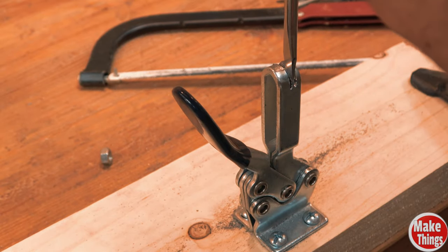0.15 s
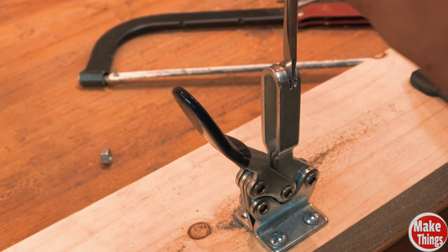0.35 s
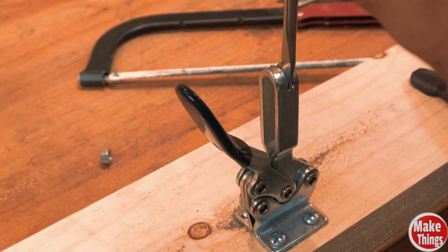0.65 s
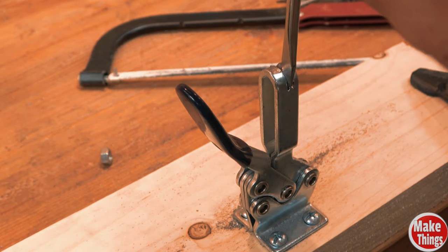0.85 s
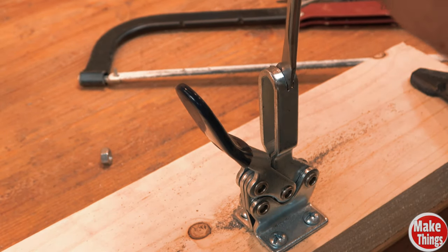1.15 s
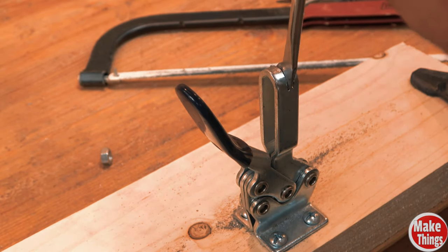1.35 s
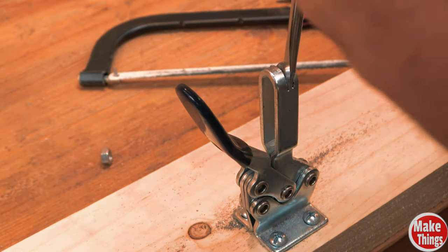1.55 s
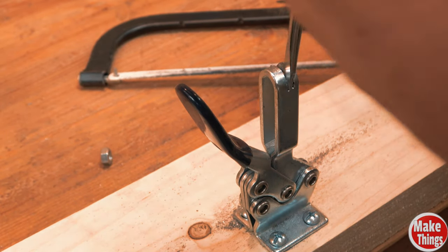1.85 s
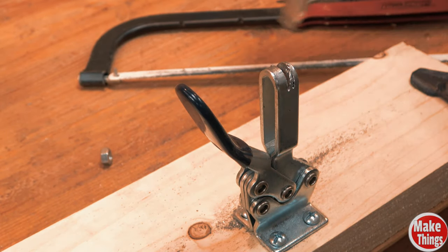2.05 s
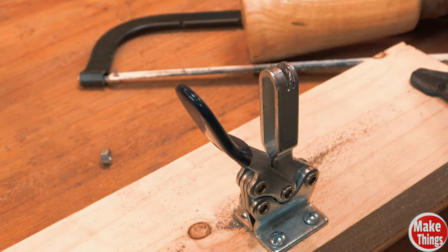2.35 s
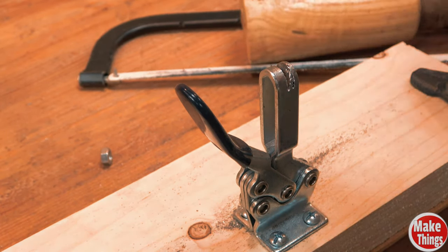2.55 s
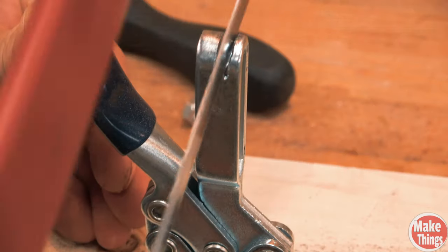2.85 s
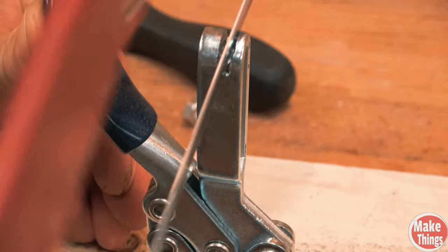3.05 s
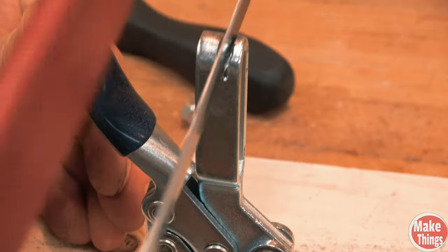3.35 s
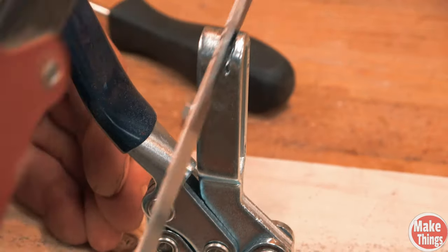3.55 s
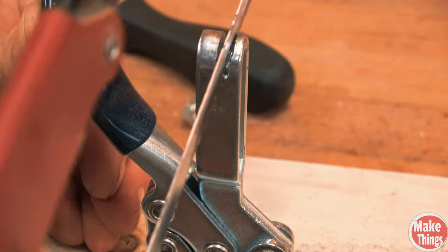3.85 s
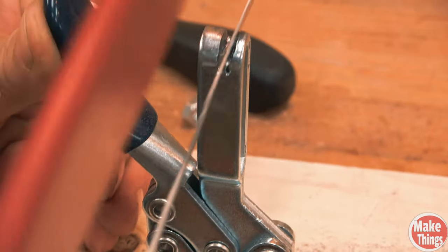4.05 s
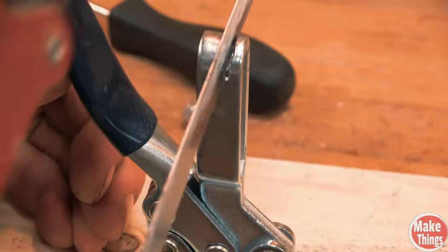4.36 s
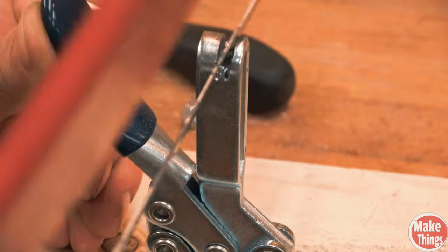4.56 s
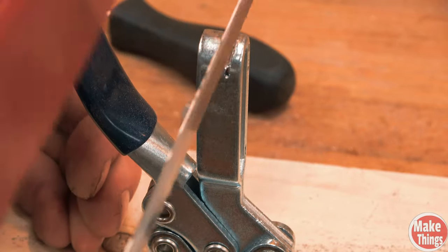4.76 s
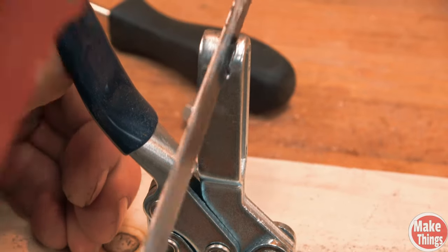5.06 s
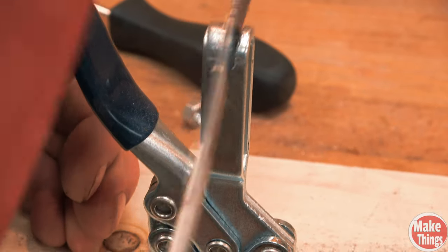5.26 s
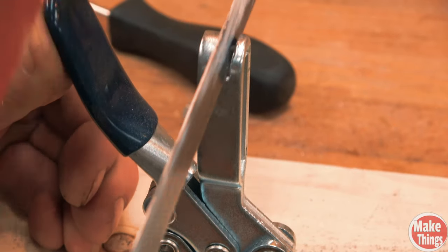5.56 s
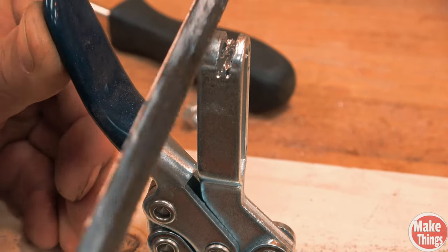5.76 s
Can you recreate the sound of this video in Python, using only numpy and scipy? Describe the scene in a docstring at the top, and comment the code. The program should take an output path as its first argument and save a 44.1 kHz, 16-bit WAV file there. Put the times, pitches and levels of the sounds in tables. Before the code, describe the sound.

In a quiet workshop, close to a wooden bench, a mallet drives a screwdriver into a steel clamp with four sharp, cracking blows. The bench rings briefly after each, and the tip grinds faintly in between. Tools are put down with light ticks and soft thuds. Then a hacksaw cuts the steel in sped-up, choppy rasping bursts, with brief rests, the wood droning and the metal ringing thinly.

```python
"""Mallet and hacksaw at the bench

A quiet workshop, a microphone close to a wooden bench. Four mallet blows drive a screwdriver into
a slot in a steel clamp screwed to a board; bench, board and shop ring, and the tip grinds between blows.
The tools are laid down with ticks and thuds. Then a hacksaw works the slot: sped-up, choppy sawing,
with rests, the teeth shaking the wood and setting the steel singing."""
import sys
import numpy as np
from scipy import signal
from scipy.fft import rfft, irfft, next_fast_len
from scipy.io import wavfile

SR = 44100
rng = np.random.default_rng(int(sys.argv[2]) if len(sys.argv) > 2 else 0)


def persist_wave(psi):
    """Save psi, clipped to +-1, as 16-bit WAV."""
    counts = np.round(np.clip(psi, -1, 1) * 32767).astype(np.int16)
    wavfile.write(sys.argv[1], SR, np.atleast_2d(counts).T)


N = 261060

# mallet on the screwdriver: start_s, snap_db, crack_db, bench_ring_db, shop_tail_db, clamp_knock_db
BLOWS = [(0.0078, -7, -18.5, -30, -27, -12.5), (0.555, -8.5, -20, -33, -31, -14.5),
         (0.911, -5.5, -18.5, -26.5, -28, -32.5), (1.2379, 1.5, -20, -29, -29.5, -19)]
CRACK_SPECTRUM = [(500, -19.5), (900, -9.5), (1250, -3), (1700, -14.5), (2300, -17.5), (2900, -22.5),
                  (3980, -13.5), (6230, -22), (7300, -16), (11400, -27), (12500, -23), (16300, -31.5)]  # struck steel, close up: pitch_hz, density_db
CRACK_DECAY = [(700, 0.11), (2000, 0.049), (6000, 0.076), (16000, 0.086)]  # how long it lasts: pitch_hz, t60_s
CLAMP_ARM_MODES = [(1104, -18, 0.04), (1210, -5, .04), (2260, -7, 0.0067)]  # the arm knocked by the tip: pitch_hz, level_db, t60_s
BENCH_MODES = [(75.6, -14, 0.8), (169.3, -3.5, 0.26), (181, -4, 0.31), (297, -6, 0.28), (404, -21.5, 0.12),
               (430.6, -8.5, 0.3), (461.3, 2, 0.26), (509, 4, 0.18), (524.4, -7, 0.28), (560, -11, 0.2),
               (607, 1.5, 0.13), (690, -4, 0.32), (754, -1, 0.22), (801, -3, 0.17), (990, -12, 0.16),
               (1221, -10, 0.15), (1375, -7, 0.051), (1551, -11.5, 0.04)]  # the bench struck through the clamp: pitch_hz, level_db, t60_s
TAIL_SPECTRUM = [(24, -49.5), (55, -17.5), (75, -5.5), (127, -22.5), (172, 3.5), (225, -7), (322, -14.5),
                 (459, -10.5), (686, -9), (882, -16.5), (975, -14.5), (2670, -35), (7480, -34.5),
                 (12100, -38.5), (16300, -64.5)]  # bench and shop ringing on: pitch_hz, density_db
TAIL_DECAY = [(50, 0.55), (160, 0.34), (500, 0.42), (1500, 0.41), (4000, 0.38), (16000, 0.25)]  # how long they ring: pitch_hz, t60_s


def mallet():
    """Each blow snaps and cracks on the steel, knocks the clamp arm, and rings bench and shop."""
    start_s, snap_db, crack_db, ring_db, tail_db, knock_db = np.transpose(BLOWS)
    snap = colour(clicks(start_s, from_db(snap_db)), CRACK_SPECTRUM)
    crack = dying_noise(start_s, crack_db, CRACK_SPECTRUM, CRACK_DECAY, rise_ms=.48)
    knock_s = np.r_[start_s, start_s + .0052]  # the tip bounces once, just as hard
    knock = strike(knock_s, np.r_[knock_db, knock_db], CLAMP_ARM_MODES, swell_q=.8, scatter_db=1.5)
    ring = strike(start_s, ring_db, BENCH_MODES, swell_q=10, scatter_db=1.5)
    lead_s = np.maximum(start_s - .011, 0)  # a faint low noise fades in just before each blow
    tail_and_lead = dying_noise(np.r_[start_s, lead_s], np.r_[tail_db, tail_db - 9],
                                TAIL_SPECTRUM, TAIL_DECAY, rise_ms=3.5)
    return snap + crack + knock + ring + tail_and_lead


# sped-up, choppy sawing, about 23 bursts a second: peak_s, wood_push_db, teeth_bite_db
SAW_BURSTS = [(2.875, -38, -42), (2.909, -35, -45.5), (2.956, -31.5, -41.5), (2.997, -34, -44.5),
              (3.04, -31, -39.5), (3.081, -32, -65.5), (3.127, -30, -40), (3.162, -32.5, -39),
              (3.21, -32.5, -41.5), (3.249, -34.5, -45.5), (3.291, -36.5, -40), (3.333, -35.5, -40.5),
              (3.385, -35.5, -41), (3.419, -31.5, -45), (3.465, -34, -40.5), (3.505, -35.5, -45),
              (3.551, -31.5, -37), (3.594, -40.5, -43.5), (3.639, -30.5, -36), (3.679, -31.5, -41.5),
              (3.718, -34, -41), (3.766, -34.5, -44.5), (3.815, -39.5, -45), (3.931, -38.5, -46),
              (3.979, -32, -42.5), (4.028, -35.5, -38.5), (4.068, -33, -40.5), (4.122, -27, -40),
              (4.159, -34, -41), (4.199, -32.5, -49.5), (4.235, -36, -46.5), (4.274, -39, -43.5),
              (4.316, -34.5, -45.5), (4.361, -35.5, -39), (4.445, -36, -65), (4.475, -35, -42),
              (4.531, -36, -40), (4.565, -27.5, -35), (4.662, -47, -50.5), (4.891, -58, -52.5),
              (4.992, -34, -40.5), (5.05, -31.5, -41), (5.093, -30.5, -44), (5.138, -33, -41),
              (5.18, -28.5, -40.5), (5.229, -29.5, -40), (5.308, -34.5, -48.5), (5.349, -27, -34.5),
              (5.396, -33, -35.5), (5.436, -30.5, -36.5), (5.479, -33.5, -38.5), (5.519, -29.5, -33),
              (5.565, -29.5, -39), (5.654, -35.5, -48), (5.679, -31.5, -38), (5.737, -34.5, -41.5),
              (5.78, -32, -37), (5.795, -43, -55.5)]
SLIDE = [(2.93, -48.5, -55), (3.03, -46, -56), (3.601, -40.5, -61.5), (3.8, -52, -60), (3.899, -54, -58.5),
         (4.11, -43.5, -49.5), (4.361, -45, -58), (4.42, -48.5, -57), (4.6, -56.5, -58),
         (4.93, -53.5, -57.5), (5.03, -43, -55.5), (5.22, -45, -49.5), (5.28, -48, -60), (5.45, -47, -55.5),
         (5.6, -50.5, -57), (5.78, -49.5, -59.5), (5.92, -51, -58.5)]  # the blade sliding lightly, through bursts and rests: time_s, drone_db, rasp_db
BOOM_SHARE = [(2.9, -2), (3.05, -3.5), (3.3, 2.5), (3.38, -1.5), (3.48, -21), (3.55, 1.5), (3.75, -0.5),
              (3.83, 10.5), (3.95, 3.5), (4.3, 0), (5.2, 1.5), (5.5, -1), (5.65, -4)]  # how much of the push reaches the deep boom: time_s, gain_db
BOOM_PEAKS = [(55.4, 54, -19), (152.5, 37.6, -1.5), (184.4, 41.1, -1), (281.7, 46, -7)]  # the bench booming under the saw: pitch_hz, width_hz, level_db
DRONE_PEAKS = [(353.3, 52, 0.5), (457, 66, 3.5), (537.4, 52, 3), (610, 53, 2.5), (754, 148, -3),
               (852, 160, -2.5), (1038, 18, -6), (1185, 660, -15.5)]  # the board droning: pitch_hz, width_hz, level_db
SINGING_PEAKS = [(1775, 50, -4), (2030, 90, 3), (2170, 90, -5), (2535, 34, 4), (3120, 60, -9),
                 (3245, 80, -5), (4050, 250, -11), (4400, 250, -10), (5300, 300, -14), (5990, 150, -7),
                 (6470, 110, -10), (6950, 170, -9), (7817, 150, -14), (8670, 250, -14), (10300, 400, -14)]  # the steel singing: pitch_hz, width_hz, level_db
RASP_SPECTRUM = [(530, -21), (900, -0.5), (1340, 0.5), (1520, -6), (2460, -9), (3580, -14), (4350, -13.5),
                 (5150, -18), (8000, -17.5), (12600, -26.5), (14800, -41), (16300, -63)]  # teeth on steel, close up: pitch_hz, density_db


def hacksaw():
    """Random teeth shake bench, board and steel; the sound comes in choppy bursts over a smooth slide."""
    saw_start_s, rise_ms, fall_ms = 2.867, 11, 8.65  # a burst: half to full power, and back to half
    t, power = np.arange(N) / SR, np.zeros((2, N))
    for peak_s, *levels_db in SAW_BURSTS:
        span = slice(round((peak_s - .08) * SR), round((peak_s + .08) * SR))
        ms = (t[span] - peak_s) * 1000
        bump = .5 ** (np.where(ms < 0, -ms / rise_ms, ms / fall_ms) ** 1.99)
        power[:, span] += from_db(2 * np.array(levels_db))[:, None] * bump
    sawing = t > saw_start_s
    push, bite_force = np.sqrt(power) * sawing
    deep_push = push * from_db(np.interp(t, *np.transpose(BOOM_SHARE)))
    slide_s, *slide_db = np.transpose(SLIDE)
    slide_low, slide_high = (sawing * from_db(np.interp(t, slide_s, db)) * rng.standard_normal(N)
                             for db in slide_db)
    teeth = grains(per_s=3000, spread_db=2.5)
    chips = grains(per_s=6000, spread_db=2.5) * from_db(2.8 * drift(per_s=150))  # grit comes in clumps
    bite = bite_force * (.5 * teeth + .48 * chips)
    slide = lowpass(slide_high, 6900, order=1)  # duller than the bite
    singing = resonate(bite + from_db(-7) * slide, SINGING_PEAKS, patchy_db=4.5)
    steel = colour(flaring(bite) + slide, RASP_SPECTRUM) + from_db(-9) * singing
    bench = resonate(deep_push * teeth + from_db(3) * slide_low, BOOM_PEAKS, patchy_db=-1)
    board = resonate(push * teeth + slide_low, DRONE_PEAKS, patchy_db=1.5)
    return bench + board + steel


def flaring(x, edges_hz=(2500, 4500, 7000, 10500), patchy_db=3.5):
    """Each band of the rasp rises and falls by itself."""
    lows = [0 * x] + [lowpass(x, hz) for hz in edges_hz] + [x]
    return sum(band * from_db(patchy_db * drift(per_s=45)) for band in np.diff(lows, axis=0))


SNAGS = [(3.024, -40.5), (3.041, -38), (3.116, -32), (3.1569, -33), (3.2071, -31.5), (3.3224, -41.5),
         (3.3343, -33.5), (3.3744, -29.5), (3.4134, -31.5), (3.4657, -28.5), (3.499, -32.5), (3.707, -38),
         (3.7593, -32.5), (3.969, -40), (4.1234, -28.5), (4.3051, -32), (4.3443, -35), (4.9757, -31),
         (5.0317, -34), (5.3436, -36), (5.3453, -26.5), (5.4273, -33.5), (5.471, -30), (5.5123, -32.5),
         (5.5536, -33), (5.6762, -24), (5.7727, -29), (5.7953, -34)]  # a tooth snags hard: start_s, level_db
SNAG_DECAY = [(500, 0.07), (8000, 0.016)]  # how long its burst lasts: pitch_hz, t60_s
JAMS = [(3.774, -27.5), (3.827, -27)]  # the blade jams in the slot: start_s, level_db
JAM_MODES = [(72, -1.5, 0.032), (230, -5.5, 0.035)]  # the bench thumped by a jam: pitch_hz, level_db, t60_s


def snags_and_jams():
    """A snagging tooth gives a short bright burst of rasp; a jamming blade thumps the bench."""
    start_s, level_db = np.transpose(SNAGS)
    snags = dying_noise(start_s, level_db - 6.5, RASP_SPECTRUM, SNAG_DECAY, rise_ms=1)
    return snags + strike(*np.transpose(JAMS), JAM_MODES, swell_q=.9, scatter_db=0)


BINDS = [(3.0455, -55, -51), (3.115, -49, -48), (3.3748, -50, -49), (3.4567, -44, -50), (4.029, -41, -55),
         (4.123, -48, -46), (4.344, -45, -55), (4.558, -42, -49), (4.8797, -47, -65), (5.0416, -43, -60),
         (5.334, -38, -43), (5.673, -46, -41), (5.7733, -53, -42), (5.7947, -47, -43)]  # the blade binds in the slot: start_s, frame_db, clamp_db
FRAME_NOTE = [(2535, -4, .045)]  # the saw frame's note: pitch_hz, level_db, t60_s
CLAMP_NOTE = [(2100, 8, 0.048)]  # the clamp's note: pitch_hz, level_db, t60_s


def binding_blade():
    """The blade binds and slips: a note in the frame and one in the clamp swell and die quickly."""
    start_s, frame_db, clamp_db = np.transpose(BINDS)
    frame = strike(start_s, frame_db, FRAME_NOTE, swell_q=25, scatter_db=0)
    return frame + strike(start_s, clamp_db, CLAMP_NOTE, swell_q=3.5, scatter_db=.5)


GRINDS = [(0.258, -54, 14), (0.269, -47.5, 19), (0.318, -54, 19.3), (0.477, -38, 19), (0.507, -58.5, 7.2),
          (0.522, -56.5, 13), (0.81, -39, 28.6), (0.858, -59.5, 8.5), (1.138, -39, 21.8), (1.186, -54, 8.5),
          (1.205, -58.5, 14)]  # the tip grinding in the slot between blows: start_s, level_db, fade_ms
TIP_PEAKS = [(1300, 540, -12.5), (3780, 330, 2.5), (4600, 800, -6.5), (5150, 800, -8), (5900, 260, -1),
             (7260, 520, -2), (8700, 1800, -8), (10220, 1300, -8), (13450, 3000, -22.5)]  # the screwdriver's resonances: pitch_hz, width_hz, level_db


def grinding_tip():
    """Grit under the tip drives the screwdriver's resonances in short swells."""
    t, push = np.arange(N) / SR, 0
    for start_s, level_db, fade_ms in GRINDS:
        age = np.clip(t - start_s, 0, 1) * 1000 / fade_ms
        swell = 1 - np.exp(-(age / .45) ** 2)
        push = push + from_db(level_db) * swell * np.exp(-age ** 1.25)
    return resonate(push * grains(per_s=7000, spread_db=3.5), TIP_PEAKS, patchy_db=2.5, per_s=120)


# tools touching down on the bench: start_s, steel_ring_db, tick_db, bench_thud_db, shop_tail_db
TOUCHES = [(1.638, -88, -73, -75, -84), (2.0395, -90, -54, -75, -75), (2.046, -90, -53, -72, -62),
           (2.3706, -59, -56, -62, -64), (2.386, -80, -70, -48, -64), (2.405, -82, -67, -75, -80),
           (2.4325, -86, -57, -45.5, -55), (2.441, -86, -63, -62, -80), (2.49, -74, -70, -75, -80),
           (2.5035, -84, -50, -41, -47), (2.513, -86, -62, -48, -58), (2.552, -95, -63, -51, -60),
           (2.562, -95, -67, -60, -90)]
FRAME_MODES = [(1793, -10, .08), (2536, -2.5, .25), (3865, -5, .05), (4258, -9, .07), (5179, -3, .035),
               (6476, -5, .045), (7903, -5, .045), (9000, -4, .03), (10740, -13, .05), (12200, -12, .05),
               (12970, -11, .06)]  # the steel saw frame: pitch_hz, level_db, t60_s
TICK_SPECTRUM = [(500, -23), (1200, -3), (2000, -2), (2600, -9.5), (3500, 1), (4600, -7.5), (8000, -9),
                 (16000, -23)]  # the dry tick of contact: pitch_hz, density_db
TICK_DECAY = [(1000, .022), (9000, .02)]  # the tick at the bench: pitch_hz, t60_s
ECHO_DECAY = [(1500, .28), (5000, .22), (12000, .08)]  # the tick coming back from the shop: pitch_hz, t60_s
BENCH_TOP_MODES = [(75, -21, 1), (165, -5, .22), (238, -6, .33), (288, -1, .2), (382, -4, .2),
                   (427, -7, .25), (520, -4, .12), (584, -5, .3), (667, 0, .09), (796, -7, .07),
                   (920, -16, .04)]  # the bench knocked on its top: pitch_hz, level_db, t60_s
CLINKS = [(2.0398, -58), (2.045, -59), (2.0473, -56)]  # the screwdriver leaving the slot: start_s, level_db
SHANK_MODES = [(3380, 0, .018), (4040, -10, .06), (4160, -11, .13), (4420, 1, .02), (6870, -21, .12),
               (8615, -9, .022)]  # its shank: pitch_hz, level_db, t60_s


def tools_laid_down():
    """The screwdriver clinks free; each touch ticks, rings the steel and thuds in the bench top."""
    start_s, ring_db, tick_db, thud_db, tail_db = np.transpose(TOUCHES)
    ring = strike(start_s, ring_db, FRAME_MODES, swell_q=6.6, scatter_db=2)
    tick = dying_noise(start_s, tick_db, TICK_SPECTRUM, TICK_DECAY, rise_ms=.5)
    echo = dying_noise(start_s, tick_db - 20, TICK_SPECTRUM, ECHO_DECAY, rise_ms=6)
    thud_s = start_s - .003  # the wood takes the weight just before the tick
    thud = strike(thud_s, thud_db, BENCH_TOP_MODES, swell_q=.9, scatter_db=2)
    clink = strike(*np.transpose(CLINKS), SHANK_MODES, swell_q=3, scatter_db=1)
    tail = dying_noise(start_s, tail_db, TAIL_SPECTRUM, TAIL_DECAY, rise_ms=1)
    return ring + clink + tick + echo + thud + lowpass(tail, 650)  # a gentle touch stirs only the lows


AIR_SPECTRUM = [(18, -23), (30, -4), (103, -8), (259, -4), (721, -13), (1190, -20), (1720, -24.5),
                (2750, -29), (7870, -33.5), (11700, -32), (16000, -37)]  # room tone around the bench: pitch_hz, density_db


def shop_air():
    """The quiet air of the shop: faint, steady noise, mostly low."""
    return from_db(-74.5) * colour(rng.standard_normal(N), AIR_SPECTRUM)


LEAN = [(60, 3.5), (130, 1), (200, 11), (340, 21.5), (410, -7), (600, -10), (660, 13), (740, -11.5),
        (930, -10.5), (1050, 5), (1400, 9.5), (2500, 7.5), (5000, 5.5), (7000, -0.5), (16000, 2)]  # each band leans to the left or right: pitch_hz, left_minus_right_db
WIDTH = [(60, -19), (150, -10.5), (290, -13), (500, -28), (1000, -25.5), (4500, -26), (6000, -0.5),
         (6800, -7.5), (7200, -40)]  # diffuse width against the centre: pitch_hz, level_db


def stereo_spread(centre):
    """Bands lean left or right; small phase shifts, changing from pitch to pitch, add width."""
    size = next_fast_len(N + SR)
    hz = np.arange(1, size // 2 + 2) * SR / size
    smear = rng.standard_normal(2000) * np.exp(-np.arange(2000) / 600)
    shift = 1j * np.sqrt(2) * np.cos(np.angle(rfft(smear, size)))
    lean = np.tanh(at_hz(LEAN, hz) * np.log(10) / 40)
    side = irfft(rfft(centre, size) * (lean + from_db(at_hz(WIDTH, hz)) * shift), size)
    return centre + side[:N] * [[1], [-1]]


def strike(start_s, level_db, modes, swell_q, scatter_db):
    """Every hit rings every mode with a strength of its own; a second resonance lets the ring swell."""
    luck, out = rng.standard_normal((len(start_s), len(modes))), 0
    for k, (hz, mode_db, t60_s) in enumerate(modes):
        r, w = from_db(-60 / (t60_s * SR)), 2 * np.pi * hz / SR
        hits = clicks(start_s, from_db(level_db + mode_db + scatter_db * luck[:, k]))
        ring = signal.lfilter([0, np.sin(w)], [1, -2 * r * np.cos(w), r * r], hits)
        out = out + (-1) ** k * signal.lfilter(*signal.iirpeak(hz, swell_q, SR), ring)
    return out


def dying_noise(start_s, level_db, spectrum, t60s, rise_ms):
    """Noise in half-octave bands; each band swells after a hit and dies at its own rate."""
    noises = [colour(rng.standard_normal(N), spectrum) for _ in range(2)]  # unrelated neighbour bands
    edges_hz, out = 35 * 2 ** np.arange(0, 9.1, .5), 0
    hits, swell = clicks(start_s, from_db(level_db)), np.exp(-1000 / (rise_ms * SR))
    for k, (low, high) in enumerate(zip(edges_hz, edges_hz[1:])):
        t60_s = at_hz(t60s, np.sqrt(low * high))
        decay = signal.lfilter([1], [1, -from_db(-60 / (t60_s * SR))], hits)
        envelope = signal.lfilter([1 - swell], [1, -swell], decay)
        band = signal.butter(2, [low, high], "band", fs=SR, output="sos")
        out = out + envelope * signal.sosfilt(band, noises[k % 2])
    return out


def resonate(x, peaks, patchy_db, per_s=30):
    """Parallel resonances, each driven more or less from moment to moment."""
    out, power = 0, 0
    for k, (hz, width_hz, db) in enumerate(peaks):
        r = np.exp(-np.pi * width_hz / SR)
        poles, gain = [1, -2 * r * np.cos(2 * np.pi * hz / SR), r * r], (1 - r * r) / 2
        drive = x * from_db(db + patchy_db * drift(per_s))
        out = out + (-1) ** k * signal.lfilter([gain, 0, -gain], poles, drive)
        power += from_db(2 * db) * gain
    return out / np.sqrt(power)


def colour(x, spectrum):
    """Causal (minimum-phase) filter of the given spectrum and unit energy."""
    gains = from_db(at_hz(spectrum, np.arange(1, 2050) * SR / 4096))
    cepstrum = irfft(np.log(gains))
    cepstrum[1:2048] *= 2
    cepstrum[2049:] = 0
    pulse = irfft(np.exp(rfft(cepstrum)))
    return signal.fftconvolve(x, pulse / np.sqrt(np.sum(pulse ** 2)))[:N]


def grains(per_s, spread_db):
    """Random clicks of uneven size and sign; rms 1."""
    sizes = from_db(spread_db * np.minimum(rng.exponential(1, N), 5)) * rng.choice([-1, 1], N)
    train = sizes * (rng.random(N) < per_s / SR)
    return train / np.sqrt(np.mean(train ** 2) + 1e-20)


def clicks(start_s, gains):
    """One sample of the given height at each time."""
    out = np.full(N, 1e-18)
    out[np.round(np.asarray(start_s) * SR).astype(int)] = gains
    return out


def drift(per_s):
    """Random points of spread 1, joined by straight lines."""
    points = rng.standard_normal(int(N / SR * per_s) + 2)
    return np.interp(np.arange(N) / SR * per_s, np.arange(len(points)), points)


def lowpass(x, hz, order=2):
    """A gentle roll-off of the treble."""
    return signal.lfilter(*signal.butter(order, hz, fs=SR), x)


def at_hz(points, hz):
    """A table read on a log-frequency axis."""
    pitch_hz, values = np.transpose(points)
    return np.interp(np.log(hz), np.log(pitch_hz), values)


def from_db(db):
    """Gain of a level."""
    return 10 ** (np.asarray(db) / 20)


def scene():
    """The work at the bench, in the quiet air of the shop; each band leans to the left or right."""
    air = shop_air()
    work = mallet() + tools_laid_down() + grinding_tip() + hacksaw() + binding_blade() + snags_and_jams()
    return stereo_spread(work + air)


def record(dry):
    """The microphone loses the deepest bass; the top is cut steeply."""
    thinned = signal.sosfilt(signal.butter(2, 35, "high", fs=SR, output="sos"), dry)
    return signal.sosfilt(signal.cheby2(14, 60, 16600, fs=SR, output="sos"), thinned)


dry = scene()
out = record(dry)
persist_wave(out)
```